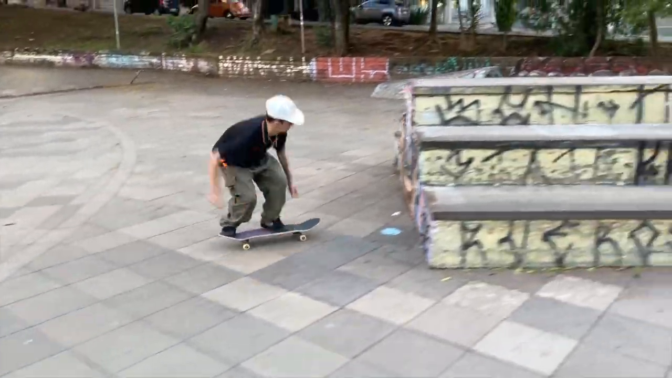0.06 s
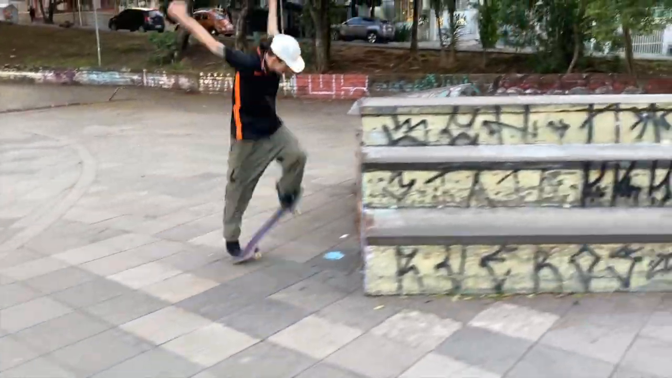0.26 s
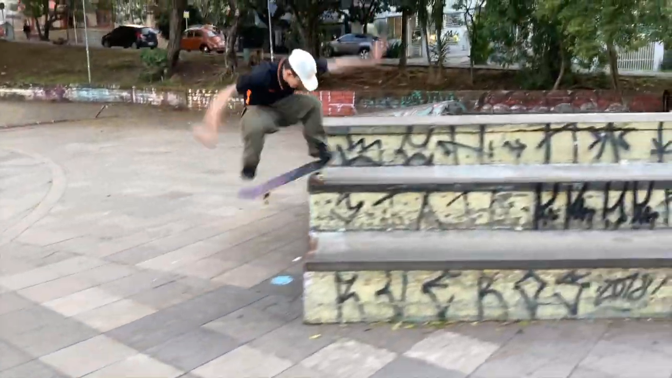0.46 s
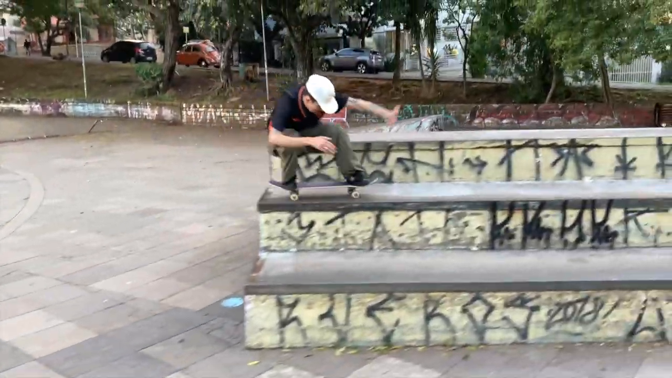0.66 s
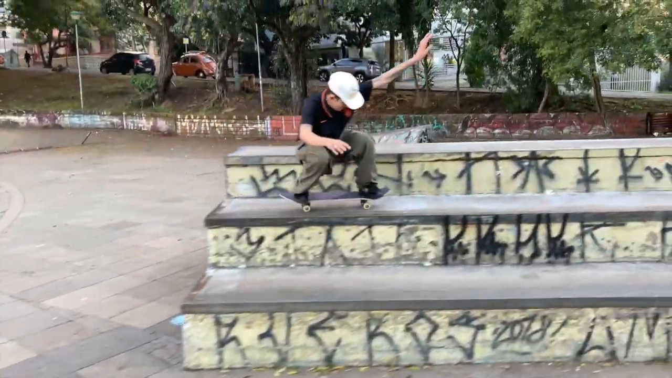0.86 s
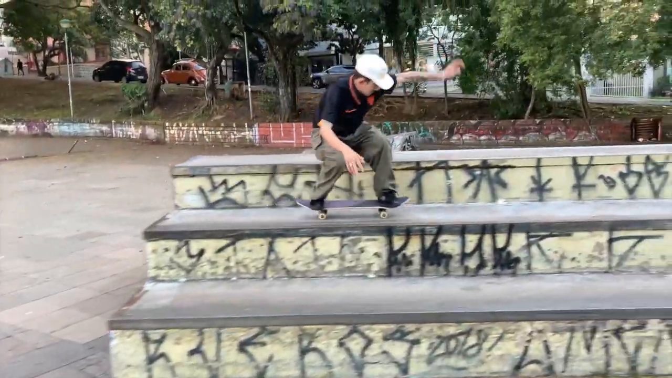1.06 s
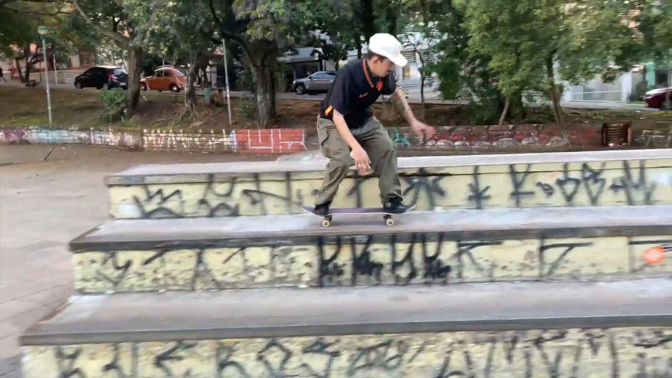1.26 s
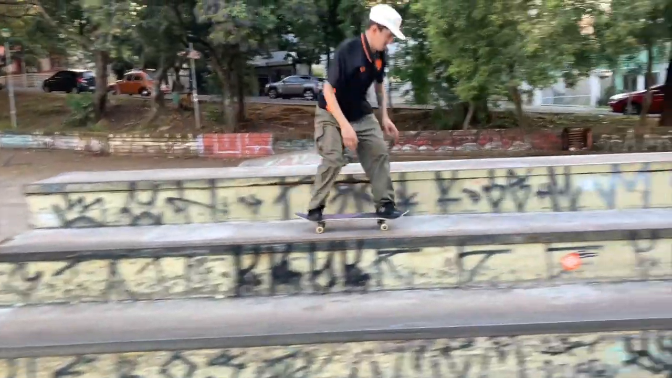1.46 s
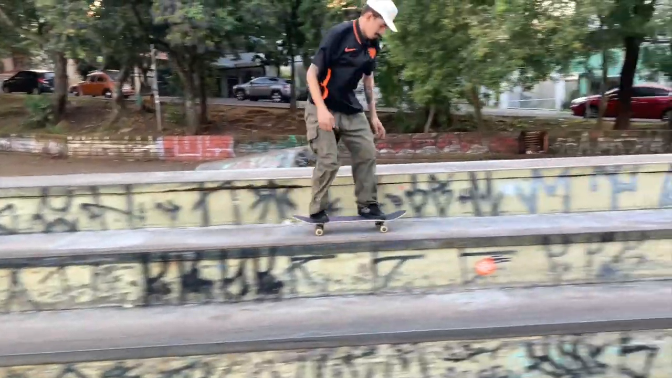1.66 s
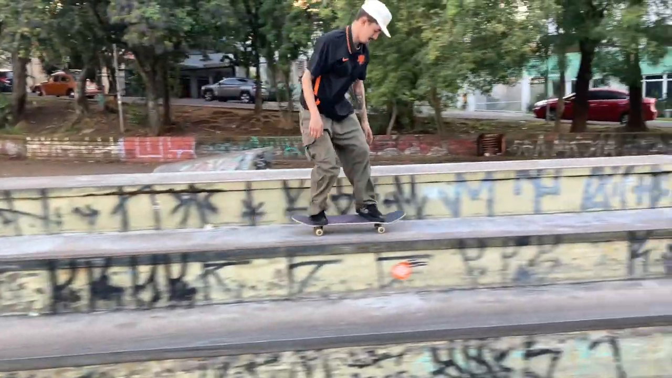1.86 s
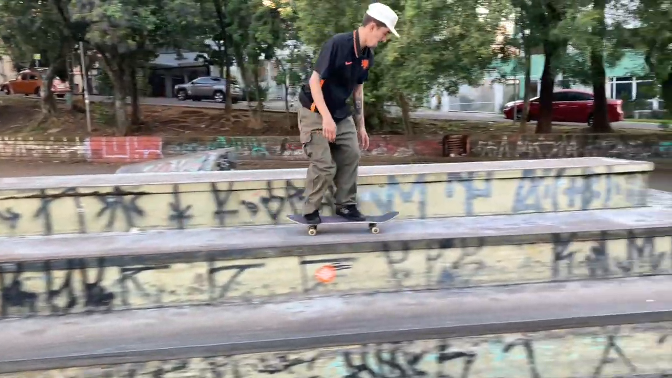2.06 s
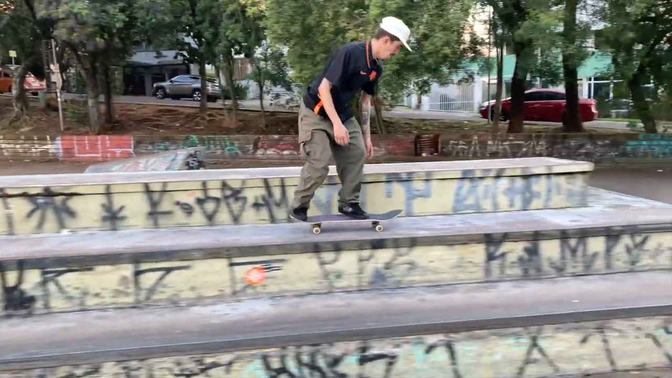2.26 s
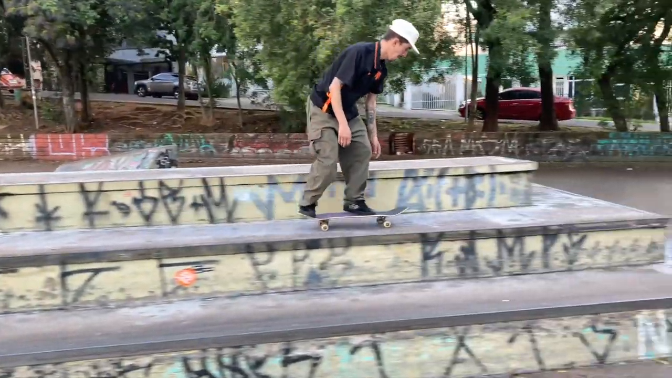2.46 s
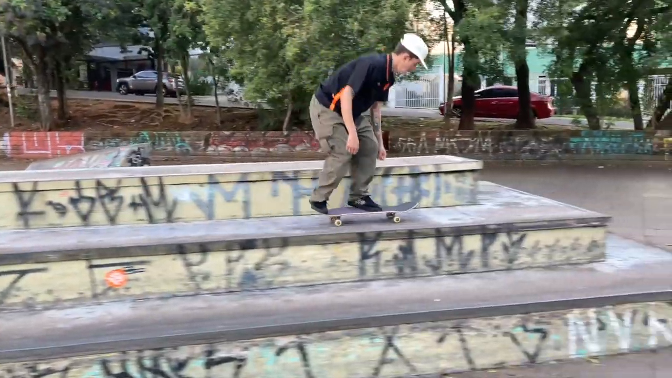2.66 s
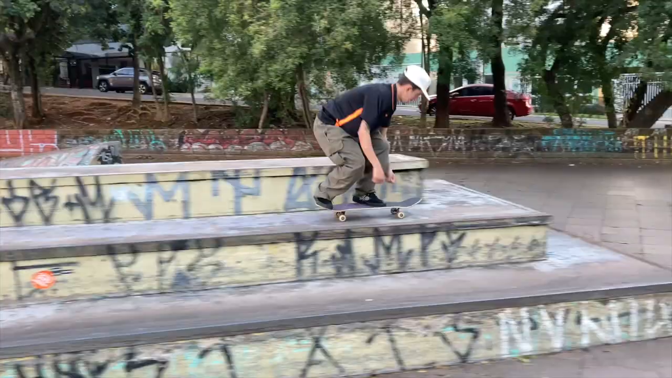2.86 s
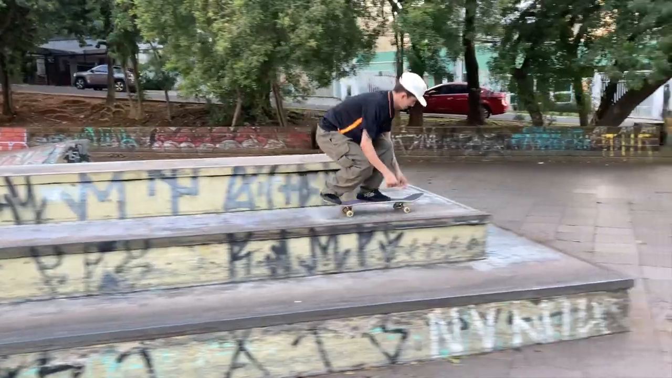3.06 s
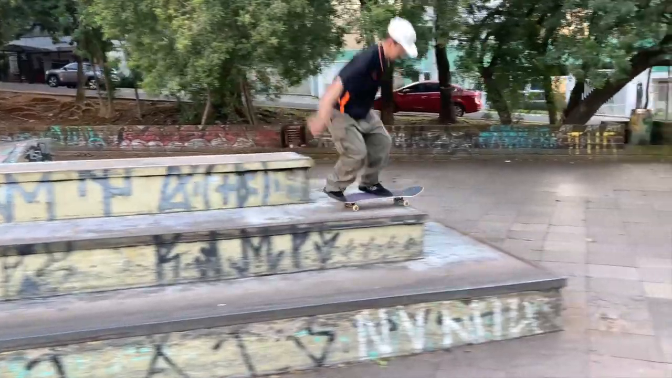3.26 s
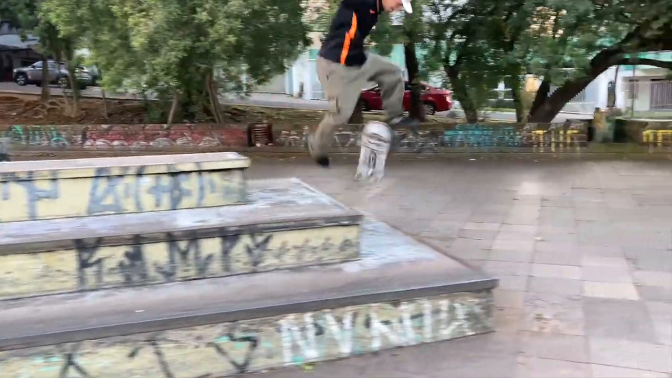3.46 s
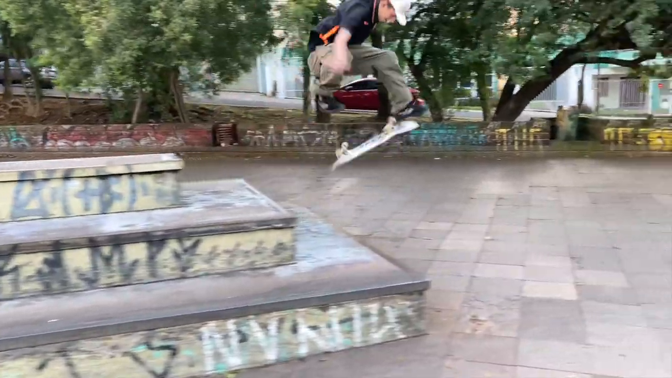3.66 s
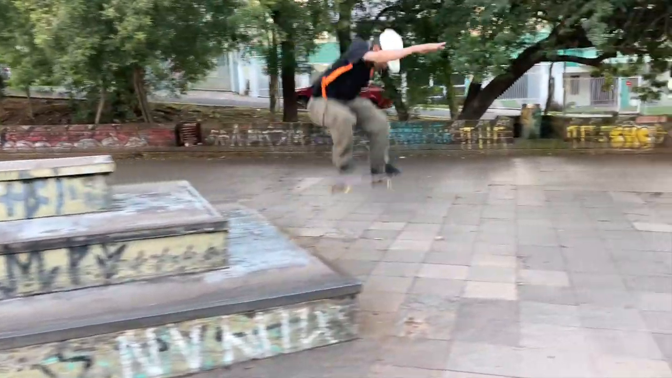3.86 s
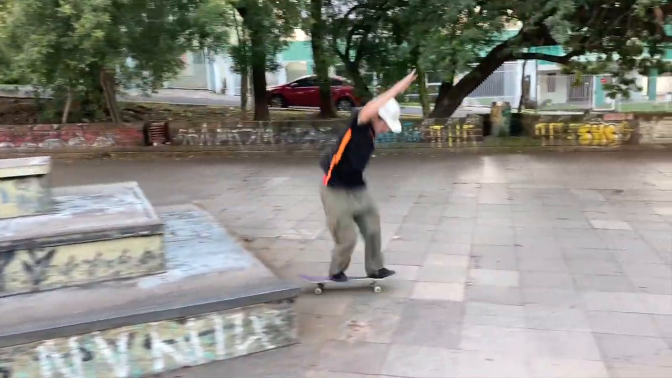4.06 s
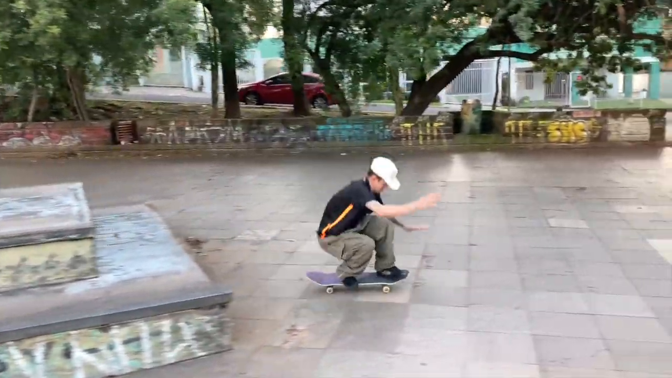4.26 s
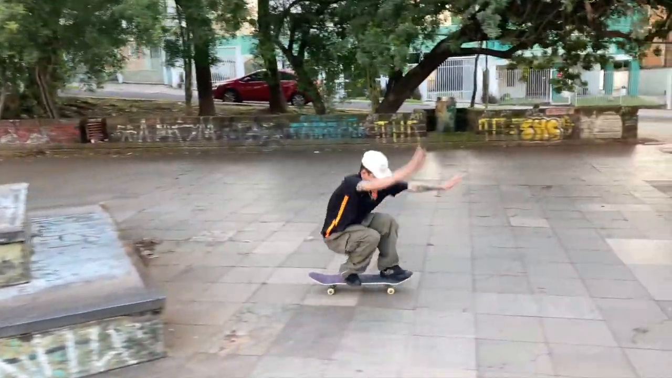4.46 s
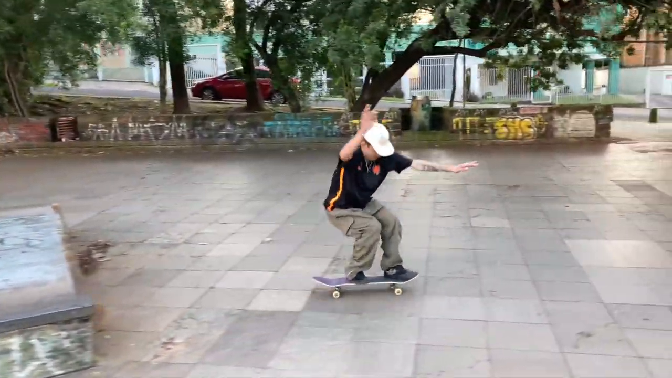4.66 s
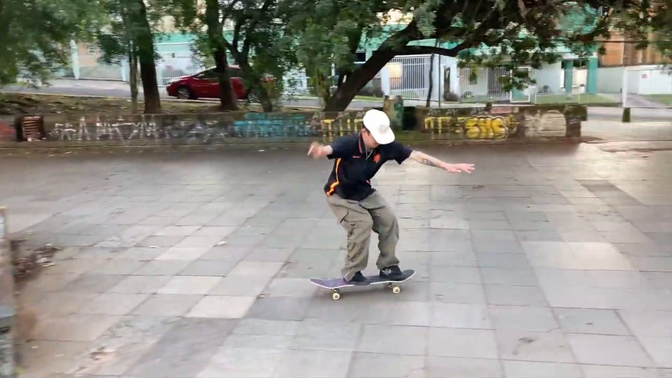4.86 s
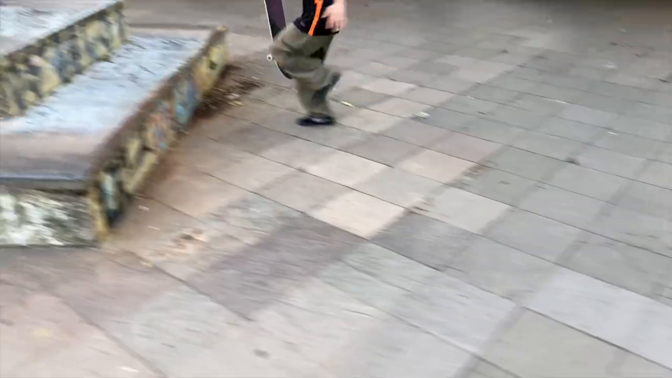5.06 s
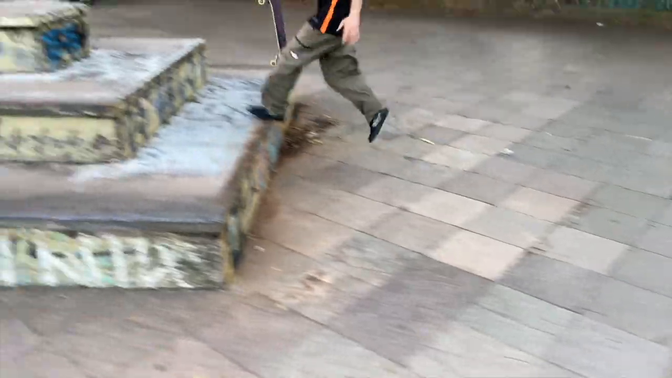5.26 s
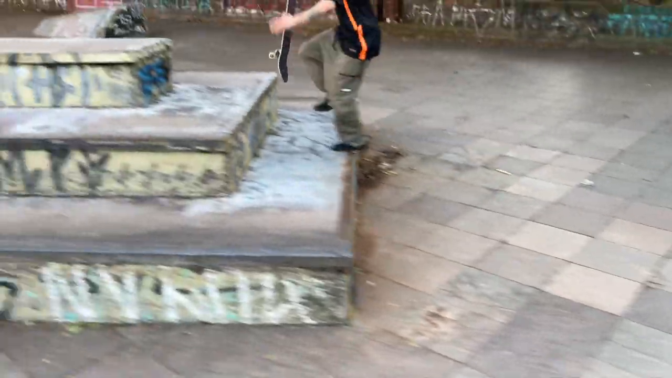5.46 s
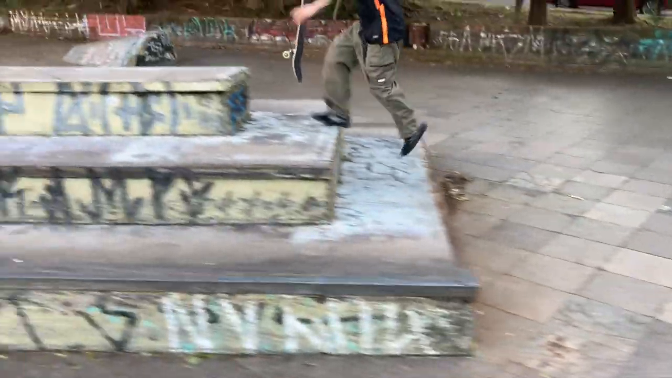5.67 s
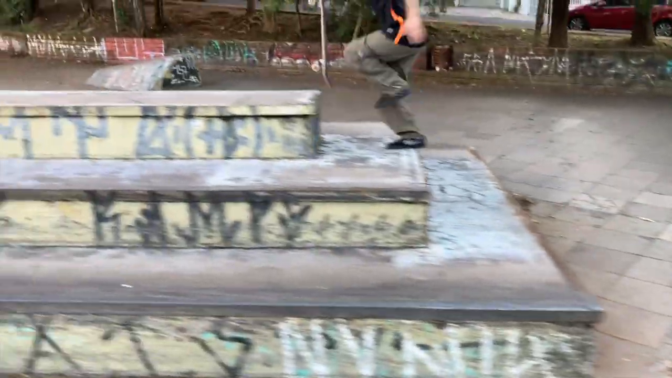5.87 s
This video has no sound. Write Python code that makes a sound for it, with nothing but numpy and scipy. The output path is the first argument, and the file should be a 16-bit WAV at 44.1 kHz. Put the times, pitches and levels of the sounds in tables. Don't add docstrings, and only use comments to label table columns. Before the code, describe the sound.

A stereo phone microphone follows a skateboard in an open paved plaza, with low traffic drone, thin leaf hiss and soft wind thumps, strongest during the first two seconds. Wheels rumble up with small knocks; the tail snaps at 0.24 s, a lighter clack follows at 0.43, and a very loud cluster of wooden slaps hits the ledge at 0.51-0.58. From 0.7 to 2.2 the board rolls along with gritty truck rattle, quick steel ticks and dull joint thuds, while a low engine passes. It smooths out, a higher engine faintly revs near 3 s, then a sharp shoe rasp and pop come at 3.36. After a quieter gap with a light catch tick at 3.8, the landing cracks loudly at 4.01-4.07 with a short scattered echo. Sandy rolling and small knocks follow until about 5 s, when a nearer board rumbles in with rapid hollow thuds over joints to the end.

```python
import sys
import numpy as np
from scipy import signal
from scipy.fft import rfft, irfft, next_fast_len
from scipy.io import wavfile
from scipy.ndimage import uniform_filter1d, map_coordinates

SR = 44100
rng = np.random.default_rng(int(sys.argv[2]) if len(sys.argv) > 2 else 0)


def makeup_ratio(level_db):
    decades = np.asarray(level_db, float) / 20
    return 10 ** decades


def unload_wav(signal):
    wavfile.write(
        sys.argv[1],
        SR,
        np.round(np.clip(np.atleast_2d(signal).T, -1, 1) * 32767).astype(np.int16),
    )


N = 261513

# frequency in Hz, likeness 0-1.
PORT_LIKENESS = [(100, 0.96), (300, 0.89), (600, 0.79), (1700, 0.77), (3500, 0.38), (5500, 0.74),
                 (7000, 0.95), (15000, 0.8)]
# frequency in Hz, level in dB.
AIR_COLOUR = [(1500, 4), (3500, -1.5), (4600, -2.5), (5600, -3.5), (8000, -3.5), (10500, 2), (13000, -6),
              (15500, -3)]
# frequency in Hz, level in dB.
CLACK_COLOUR = [(600, -2.5), (1100, 1.5), (1500, 1), (2000, 0.5), (2600, -11.5), (3200, -24), (5000, -46)]
# frequency in Hz, level in dB.
GRIT_COLOUR = [(2200, -36), (3000, -3.5), (4200, 5.5), (5000, -3.5), (6500, -40)]
# pitch in Hz, width in Hz, level in dB.
THUMP_MODES = [(191, 36.4, -7), (282.7, 37, -5)]
KNOCK_MODES = [(552.5, 96, -4.5), (665, 45.6, -11)]
TICK_MODES = [(2453, 130, -2), (2870, 136, -3), (4370, 490, -22)]
# start in seconds, end in seconds, rattle in dB, tick in dB.
ROUGH_STONE = [
    (.68, 1.446, -42.5, -37),
    (1.718, 2.243, -40.5, -32.5),
]
SWELL_S = 0.28


def unit(x):
    return x / np.sqrt(np.mean(x ** 2) + 1e-20)


def along(points, hz):
    f, value = np.transpose(points)
    return np.interp(np.log(hz + 1), np.log(f + 1), value)


def curve(rows):
    return np.interp(np.arange(N) / SR, *np.transpose(rows))


def wobble(rate):
    knots = rng.standard_normal(int(N * rate / SR) + 4)
    return map_coordinates(knots, [np.arange(N) * rate / SR])


def add_at(track, s, sound):
    start = round(s * SR)
    track[..., start:start + sound.shape[-1]] += sound


def filtered(x, response):
    m = next_fast_len(N + SR // 4)
    return irfft(rfft(x, m) * response(np.fft.rfftfreq(m, 1 / SR)), m)[..., :N]


def coloured(pair, spectrum, alike=PORT_LIKENESS):
    def mid_side_gain(hz):
        turn = np.arccos(np.clip(along(alike, hz), -1, 1)) / 2
        return makeup_ratio(along(spectrum, hz)) * [np.cos(turn), np.sin(turn)]

    mid, side = filtered(pair, mid_side_gain)
    return unit(np.array([mid + side, mid - side]))


def gritty(rate, spread_db, share, grain):
    struck = rng.random(N) < rate / SR
    size = struck * makeup_ratio(spread_db * np.minimum(rng.exponential(size=N), 3))
    flare = signal.lfilter([1], [1, -np.exp(-1 / (grain * SR))], size)
    share = np.clip(share, 0, 1)
    return (share * unit(flare) + 1 - share) * rng.standard_normal((2, N))


def ringing(modes, t, damping):
    total = 0
    for hz, width, db in modes:
        strength, detune = rng.standard_normal(2)
        decay = np.exp(-np.pi * width * damping * t)
        total = total + makeup_ratio(db + 2 * strength) * decay * np.sin(2 * np.pi * hz * (1 + 0.063 * detune) * t)
    return total


def shaking(rows):
    t = np.arange(N) / SR
    total = 0
    for start, end, db, *_ in rows:
        total = total + makeup_ratio(db) * np.clip(np.minimum(t - start, end - t) / SWELL_S, 0, 1) ** 2
    return total


def ground():
    # time in seconds, level in dB.
    drone = [(0, -39), (.75, -29), (1.05, -34), (1.9, -37), (2.9, -27), (3.45, -26.5), (3.8, -31),
             (4.2, -35.5), (4.5, -30.5), (5.0, -31), (5.93, -37.5)]
    # time in seconds, level in dB.
    rolling = [
        (0, -26.5),
        (.38, -29),
        (.58, -23.5),
        (.85, -26),
        (2.0, -28),
        (3.3, -28.5),
        (4.2, -30.5),
        (5.05, -28),
        (5.28, -25),
        (5.93, -25),
    ]
    # time in seconds, level in dB.
    breeze = [(0, -40.5), (.38, -45.5), (.6, -40), (1.9, -39.5), (2.4, -42.5), (3.25, -42.5), (3.55, -47.5),
              (4.05, -43.5), (4.4, -40.5), (4.75, -46.5), (5.93, -48)]
    # frequency in Hz, level in dB per Hz.
    traffic_colour = [(13, -48), (22, 12.5), (40, 4), (64, 5.5), (103, -7), (140, -3), (178, -7),
                      (300, -27), (390, -41), (660, -120)]
    far_colour = [(71, -0.5), (120, -1), (173, -9), (259, -4), (449, -7), (535, -4.5), (701, -3),
                  (881, -15.5), (1170, -8), (1360, -17), (1550, -10.5), (2000, -22.5), (3000, -36),
                  (3900, -61), (6600, -120)]
    near_colour = [(59, -36), (100, -6), (188, 0.5), (273, -2.5), (401, -7.5), (657, -2), (868, -14),
                   (1220, -7), (1560, -21), (1740, -15.5), (2090, -27), (2330, -30.5), (2940, -29),
                   (4000, -59), (5200, -93), (8800, -120)]
    # frequency in Hz, level in dB.
    truck_colour = [(1800, -3.5), (2400, -5.5), (3000, -0.5), (3500, -5.5), (4500, -36)]
    # start in seconds, end in seconds, level in dB.
    sandy = [
        (-.2, .55, -54),
        (3.546, 4.6, -48.5),
        (4.5, 5.102, -47),
    ]

    t = np.arange(N) / SR
    traffic_noise = coloured(rng.standard_normal((2, N)), traffic_colour, [(60, .8)])
    traffic = makeup_ratio(curve(drone) + 2 * wobble(7)) * traffic_noise

    far = coloured(gritty(150, spread_db=3.0, share=0.26, grain=0.0093), far_colour)
    near_grit = gritty(110, spread_db=4.0, share=0.29, grain=0.0097)
    near = coloured(near_grit, near_colour, [(300, 0.95), (1200, 0.85), (3000, 0.38)])
    change = np.clip((t - 5.04) / 0.052, 0, 1)
    roll = makeup_ratio(curve(rolling) + 1.05 * wobble(30)) * ((1 - change) * far + change * near)

    rattle_noise = coloured(gritty(110, spread_db=-0.5, share=0.84, grain=0.0077), truck_colour)
    rattle_gain = makeup_ratio(-56) + shaking(ROUGH_STONE + sandy)
    rattle = rattle_gain * makeup_ratio(0.53 * wobble(20)) * rattle_noise

    hiss_noise = coloured(gritty(200, spread_db=1.5, share=0.22, grain=0.0017), AIR_COLOUR)
    hiss = makeup_ratio(curve(breeze) + 0.47 * wobble(7.3)) * hiss_noise
    sand_noise = coloured(gritty(230, spread_db=9.0, share=0.29, grain=0.005), GRIT_COLOUR)
    sand = makeup_ratio(-2) * shaking(sandy) * sand_noise
    return traffic + roll + rattle + sand + hiss


def buffet():
    # frequency in Hz, level in dB per Hz.
    wind_colour = [(20, -40), (45, 0), (80, 1.5), (160, -6), (300, -8.5), (430, -19), (800, -120)]
    # time in seconds, level in dB.
    gusts = [
        (0, -28.5),
        (.8, -26),
        (1.9, -29.5),
        (2.4, -37.5),
        (3.1, -32.5),
        (3.5, -44),
        (5.0, -44),
        (5.93, -51),
    ]
    lumps = makeup_ratio(1.5 * (wobble(9) + np.array([wobble(13), wobble(15)])))
    wind = coloured(rng.standard_normal((2, N)), wind_colour, [(100, -0.74)])
    return makeup_ratio(curve(gusts)) * unit(lumps * wind)


def taps():
    # start in seconds, peak in dB, pitch in Hz.
    flexes = [(0.046, -31, 242), (0.103, -24, 519), (0.525, -18, 519), (0.534, -19, 304), (0.549, -21, 393),
              (0.785, -19, 296), (0.847, -28, 283), (0.914, -20, 390), (1.039, -25, 312), (1.13, -16, 350),
              (1.189, -25, 382), (1.305, -28, 385), (1.599, -27, 334), (1.71, -18, 334), (1.739, -24, 409),
              (1.971, -16, 242), (2.309, -29, 495), (3.094, -29, 490), (3.291, -16, 243), (3.619, -31, 242),
              (3.748, -29, 248), (3.915, -23, 261), (3.969, -30, 242), (4.004, -14, 318), (4.161, -34, 460),
              (4.355, -20, 242), (4.423, -26, 250), (4.549, -21, 275), (4.688, -25, 476), (5.071, -18, 503),
              (5.084, -24, 519), (5.123, -21, 242), (5.132, -17, 242), (5.193, -18, 242), (5.22, -15, 247),
              (5.231, -21, 242), (5.249, -23, 353), (5.327, -16, 377), (5.342, -20, 242), (5.426, -23, 269),
              (5.5, -22, 293), (5.557, -17, 242), (5.569, -13, 291), (5.588, -23, 501), (5.62, -24, 307),
              (5.715, -12, 323), (5.721, -15, 242), (5.729, -16, 242), (5.757, -26, 342), (5.805, -21, 277),
              (5.825, -23, 242), (5.868, -15, 256), (5.921, -19, 519)]
    # start in seconds, peak in dB, pitch in Hz.
    cracks = [(0.1311, -28, 4320), (0.1614, -36, 4290), (0.4753, -31, 3350), (0.8235, -37, 2710),
              (0.8544, -39, 3180), (0.8759, -38, 3210), (0.9328, -34, 2970), (0.9542, -30, 2770),
              (0.9844, -33, 2610), (0.9994, -36, 3060), (1.0201, -32, 2700), (1.0445, -28, 2790),
              (1.0544, -38, 3290), (1.0744, -37, 2970), (1.0949, -33, 2680), (1.1204, -32, 2640),
              (1.1794, -40, 2750), (1.2044, -36, 3060), (1.2436, -28, 2940), (1.3034, -38, 2870),
              (1.3184, -34, 2840), (1.6038, -29, 4260), (1.6204, -35, 4730), (3.2565, -29, 4340),
              (3.2814, -36, 2740), (3.3644, -20, 4210), (3.3747, -18, 2900), (3.3854, -23, 4150),
              (3.7988, -31, 2860), (3.8274, -31, 2670), (4.3555, -26, 4810), (4.5496, -28, 4230),
              (4.563, -23, 4360), (4.5855, -26, 4020), (4.6892, -33, 3530), (4.7112, -25, 3350),
              (4.7311, -22, 2960), (4.7526, -29, 3040), (4.786, -34, 2920), (5.0649, -31, 2790),
              (5.1731, -39, 3200), (5.2155, -32, 2600), (5.2674, -40, 3060), (5.5533, -25, 2900),
              (5.5767, -32, 2610), (5.6344, -42, 2900), (5.7124, -26, 2850), (5.7309, -32, 2950),
              (5.7907, -38, 2910), (5.8014, -42, 3050)]
    t = np.arange(SR // 25) / SR
    out = np.zeros(N + SR)
    for rows, cycles, gain_db, ratio in ((flexes, 2.38, 4.5, 1.3), (cracks, 9.1, 1.5, 0.82)):
        for s, db, hz in rows:
            width = hz / (np.pi * cycles)
            modes = [(hz, width, 0), (ratio * hz, width, -6)]
            onset = 1 - np.exp(-t * hz * 2.4 / cycles)
            add_at(out, s, makeup_ratio(db + gain_db) * onset * ringing(modes, t, 0.99))
    return out[:N]


def scuffs():
    # start in seconds, peak in dB, length in seconds, pressure in dB.
    sole_drags = [(0.059, -26, 0.018, -1), (0.095, -23, 0.015, 1), (0.135, -24.5, .019, 2),
                  (0.252, -22, 0.025, -14), (0.299, -35, 0.024, 11), (0.462, -31.5, 0.046, 8.5),
                  (0.508, -13, 0.025, -3), (0.588, -16, .02, 4), (1.504, -28, 0.034, -1),
                  (1.58, -29.5, 0.015, 7), (1.54, -28, .008, -6), (1.603, -23.5, .015, 2),
                  (1.612, -26.5, 0.0075, 3), (1.859, -30.5, 0.029, 3), (2.516, -31.5, 0.039, 6),
                  (2.567, -34, .024, -2), (2.6, -29, 0.013, 3),
                  (3.237, -27.5, 0.016, -3), (3.25, -24, 0.006, -3), (3.256, -20.5, 0.0068, -1),
                  (3.275, -36, 0.0096, 5), (3.34, -32, .008, 6), (3.355, -13, .008, 0),
                  (3.359, -7, .01, -5), (3.371, -24.5, 0.023, 10.5), (3.43, -37.5, 0.094, 13),
                  (3.796, -26, .01, 13), (3.816, -35, .01, 10), (3.834, -30, .02, -4),
                  (3.92, -31.5, 0.018, 7), (3.951, -34, .018, -2), (4.067, -27.5, 0.011, 16),
                  (4.075, -24.5, 0.012, 12.5), (4.337, -33, .029, 8), (4.354, -29.5, .02, 7),
                  (4.522, -28.5, 0.013, -1), (4.548, -20, 0.0079, -1), (4.57, -31, 0.014, -6),
                  (4.583, -26, 0.0084, 2), (4.689, -34, 0.011, 8), (4.799, -37.5, .04, 8),
                  (4.972, -27.5, 0.013, -2)]
    # frequency in Hz, level in dB.
    dust_colour = [(4500, -29), (6500, 0), (8000, -7), (10500, 1.5), (13000, -4), (15500, -3)]
    t = np.arange(SR // 4) / SR
    drag = np.zeros((3, N + SR))
    for s, db, length, press_db in sole_drags:
        shape = (1 - np.exp(-t / 0.0018)) * np.exp(-(t / max(length, .004)) ** 1.1)
        layer_db = np.array([[-7], [-16.5 + 0.67 * press_db], [press_db - 9.5]])
        add_at(drag, s, makeup_ratio(db + layer_db) * shape)
    rasp = gritty(280, spread_db=4.0, share=0.53, grain=0.0036)
    colours = (dust_colour, GRIT_COLOUR, CLACK_COLOUR)
    return sum(level[:N] * coloured(rasp, colour) for level, colour in zip(drag, colours))


def blows():
    # start in seconds, knock in dB, clack in dB, crack in dB, clack pitch in Hz.
    slaps = [(.13, -20, -24, -26.5, 1290), (.242, -20, -10, -17, 1840), (0.429, -24, -17, -16, 2140),
             (.512, -7, -12.5, -15.5, 1690), (.517, -9, -23, -29, 1290), (.543, -20, -17, -40, 1090),
             (.578, -6, -11.5, -6.5, 1750), (.582, -0.5, -9, -39, 1780), (3.376, -14.5, -15.5, -17.5, 1280),
             (3.824, -39, -21, -30.5, 2320), (4.009, -7, -9.5, -7, 1560), (4.017, -10, -4, -11.5, 1400),
             (4.028, -13, -18, -24, 1200), (4.068, -11, -20, -24, 1250), (4.355, -24, -27, -36, 1160),
             (4.564, -17.5, -26, -25.5, 1260), (4.712, -17, -23, -32, 1150), (4.731, -23, -24, -32.5, 2420),
             (4.752, -34, -29, -34, 2140), (4.785, -21, -33, -38, 1110)]
    # frequency in Hz, level in dB.
    crack_colour = [(2000, -23), (3200, 1), (4200, 0.5), (5600, -7), (7000, -7), (10500, -4),
                    (13000, -10.5), (15500, -9.5)]
    t = np.arange(SR // 8) / SR
    knock, clack, crack = np.zeros((3, N + SR))
    for s, knock_db, clack_db, crack_db, hz in slaps:
        t60 = max(0.035 - .0006 * clack_db, .01)
        ring = ringing(KNOCK_MODES, t, 0.029 / t60) + makeup_ratio(-13.5) * ringing(THUMP_MODES, t, 0.041 / t60)
        clack_modes = [(hz, 130, 0), (1.25 * hz, 170, -6)]
        tail = makeup_ratio(clack_db - knock_db - 1) * ringing(clack_modes, t, .05 / t60)
        add_at(knock, s, makeup_ratio(knock_db + 8.5) * (1 - np.exp(-t / 0.0032)) * (ring + tail))
        add_at(clack, s, makeup_ratio(clack_db - 60 * t / (1.1 * t60)) * (1 - np.exp(-t / 0.00089)))
        add_at(crack, s, makeup_ratio(crack_db + 4.0 - 60 * t / (0.73 * t60)) * (1 - np.exp(-t / 0.0021)))
    close = [(1500, 0.99), (3000, 0.81), (6000, 1.0), (8000, 0.79)]  # (Hz, likeness of the ports)
    clack_noise = coloured(rng.standard_normal((2, N)), CLACK_COLOUR, close)
    crack_noise = coloured(rng.standard_normal((2, N)), crack_colour, close)
    return knock[:N] + clack[:N] * clack_noise + crack[:N] * crack_noise


def turns():
    ticks = []
    for start, end, _, db in ROUGH_STONE:
        for k in range(30):
            late, louder = rng.standard_normal(2)
            s = start + SWELL_S / 2 + 0.021 * (k + .3 * late)
            if s < end - SWELL_S / 4:
                ticks.append((s, db + 2.5 * louder))
    return ticks


def chatter():
    # start in seconds, peak in dB.
    truck_knocks = [(.9779, -24), (1.044, -23), (1.1091, -28), (1.1204, -26.5), (1.262, -26), (1.2777, -21),
                    (1.3436, -27), (1.4543, -26), (1.8874, -29), (1.901, -26), (1.9098, -24), (1.9273, -27),
                    (2.0764, -33), (2.2124, -18.5)]
    # start in seconds, peak in dB, pitch in Hz.
    axle_pings = [
        (0.242, 1, 3440),
        (0.5797, 2, 4300),
        (4.0105, 1, 4260),
        (4.0692, -24, 4100),
    ]
    t = np.arange(SR // 40) / SR
    out = np.zeros(N + SR)
    for s, db in truck_knocks + turns():
        add_at(out, s, makeup_ratio(db + 4) * (1 - np.exp(-t / .0005)) * ringing(TICK_MODES, t, 2))
    for s, db, hz in axle_pings:
        modes = [(hz, 170, 0), (1.06 * hz, 200, -4)]
        add_at(out, s, makeup_ratio(db - 3) * (1 - np.exp(-t / .001)) * ringing(modes, t, 1.6))
    return out[:N]


def joints():
    # start in seconds, peak in dB, thump in dB, sharpness in dB.
    far_drops = [(.762, -5, -15, -17), (.784, -14, -8, -28), (.908, -11.5, -10, -6.5),
                 (.934, -14.5, -22, -14), (1.131, -5.5, -29, -14), (1.155, -11, -25, -20),
                 (1.242, -11, -26, -22), (1.675, -17, 0.5, -7), (1.71, -17.5, -0.5, -1.5),
                 (1.953, -5.5, -11, -8), (1.967, -15, -2, 1), (2.21, -16, -7, -4), (3.024, -7.5, -8.5, -7),
                 (3.286, -5, -9.5, -9.5), (3.499, -18.5, -3.5, -11), (4.3, -15.5, -2.5, 4.5),
                 (4.511, -12.5, -6.5, -18), (4.586, -12, -9, -9)]
    near_drops = [(5.065, -4, -8.5, -5.5), (5.154, -10, -5, -16), (5.173, -7, -14, -14),
                  (5.194, -8.5, -8.5, -11), (5.216, -5, -12, -2), (5.323, -13.5, -6, -2),
                  (5.476, -21, 6, -7), (5.553, -7, -7.5, -1), (5.578, -4, -12, -10.5),
                  (5.659, -11.5, -6, -20), (5.703, -6, -30, -23), (5.71, -4.5, -7.5, -0.5),
                  (5.732, -18.5, -5, 1), (5.791, -7.5, -11, -15), (5.865, -7.5, -12.5, -18),
                  (5.895, -15, 1.5, -9)]
    # pitch in Hz, width in Hz, level in dB.
    ping_modes = [(1167, 126, -0.5), (1438, 125, -8), (1770, 260, -11.5)]
    t = np.arange(SR // 14) / SR
    out, dust = np.zeros((2, N + SR))
    u = (t - .0015) / .00016
    snap = -u * np.exp(-u * u / 2)
    for rows, damping in ((far_drops, 1.23), (near_drops, 0.98)):
        for s, db, thump_db, sharp_db in rows:
            tick_db = -15.5 + 0.76 * sharp_db
            thud = makeup_ratio(db + thump_db + 6.5) * ringing(THUMP_MODES, t, damping)
            thud += makeup_ratio(db + 3) * ringing(KNOCK_MODES, t, damping)
            thud += makeup_ratio(db + sharp_db + 6) * ringing(ping_modes, t, damping)
            thud += makeup_ratio(db + tick_db + 1.5) * ringing(TICK_MODES, t, damping)
            add_at(out, s, thud * (1 - np.exp(-t / .001)))
            add_at(out, s, makeup_ratio(db - 7 + 0.4 * sharp_db) * snap)
            add_at(dust, s, makeup_ratio(db + tick_db - 9.5) * np.exp(-t / 0.0086))
    return out[:N] + dust[:N] * coloured(rng.standard_normal((2, N)), AIR_COLOUR)


def engines():
    # time in seconds, pitch in Hz, level in dB.
    passes = [
        [(1.1, 82, -37), (1.5, 79.3, -32.5), (1.9, 79.8, -31)],
        [(2.55, 129.8, -48), (3.0, 150.5, -30.5), (3.25, 152.4, -37.5), (3.7, 148.4, -32.5)],
    ]
    t = np.arange(N) / SR
    out = np.zeros((2, N))
    for rows in passes:
        s, hz, db = np.transpose(rows)
        pitch = np.interp(t, s, hz) * (1 + 0.0354 * wobble(13.86))
        phase = 2 * np.pi * np.cumsum(pitch) / SR
        fade = np.clip(np.minimum(t - s[0], s[-1] - t) / 0.11, 0, 1)
        level = makeup_ratio(np.interp(t, s, db) + 2.5 + 2.6 * wobble(9))
        out += fade * level * np.sin(phase + [[.15], [-.15]])
    return out


def plaza(x):
    # frequency in Hz, time to fall 60 dB in seconds.
    decay_times = [(200, 0.2), (2000, 0.17), (10000, 0.27)]
    hz, t, z = signal.stft(rng.standard_normal((2, SR // 2)), SR, nperseg=256)
    z[1] = np.where(hz[:, None] > 6000, z[0], z[1])
    fading = makeup_ratio(-60 * t / along(decay_times, hz)[:, None])
    tail = signal.istft(z * fading, SR, nperseg=256)[1]
    delayed = np.pad(x, ((0, 0), (400, 0)))
    return signal.fftconvolve(delayed, tail / np.linalg.norm(tail[0]), axes=1)[:, :N]


def scene():
    board = blows() + scuffs() + joints() + chatter()
    return board + makeup_ratio(-11.5) * plaza(board) + ground() + engines() + buffet() + taps()


def roll_off(x):
    return signal.sosfilt(signal.butter(12, 16830, fs=SR, output="sos"), x)


def record(dry):
    # frequency in Hz, phase in radians.
    left_lead = [(0, 0), (860, .2), (1700, 0), (3100, 1.5), (4500, .4), (5500, 2.1), (6900, 0),
                 (15860, -12.57), (18100, -15.7)]
    f, rad = np.transpose(left_lead)

    def ports(hz):
        phase = np.exp(.5j * np.interp(hz, f, rad) * [[1], [-1]])
        return phase * (hz < 16600) / (1 + (42 / (hz + 1)) ** 6)

    x = filtered(dry, ports) * makeup_ratio([[-.55], [.55]])
    power = np.abs(uniform_filter1d(np.mean(x ** 2, 0), size=441))
    level_db = 10 * np.log10(power + 1e-12)
    u = np.arange(SR // 2) / SR / 0.055
    lag = u * np.exp(-u) / (.06 * SR)
    duck_db = signal.fftconvolve(np.maximum(level_db + 16.0, 0), lag)[:N]
    x = x * makeup_ratio(-9 * duck_db)
    x = x / (1 + np.abs(x / .97) ** 6) ** (1 / 6)
    return roll_off(x)


dry = scene()
out = record(dry)
unload_wav(out)
```